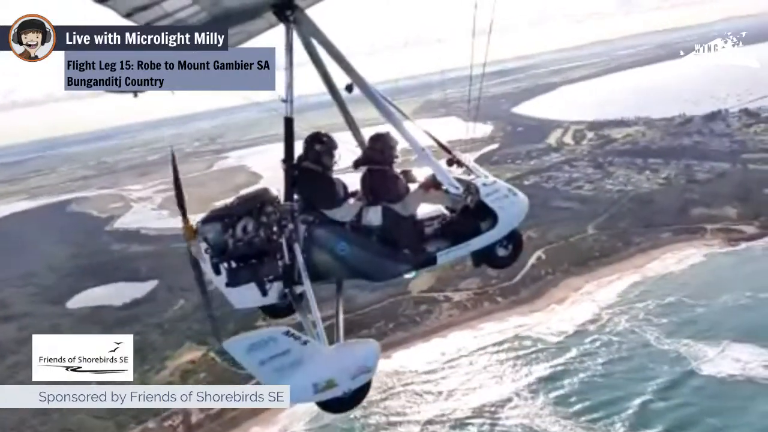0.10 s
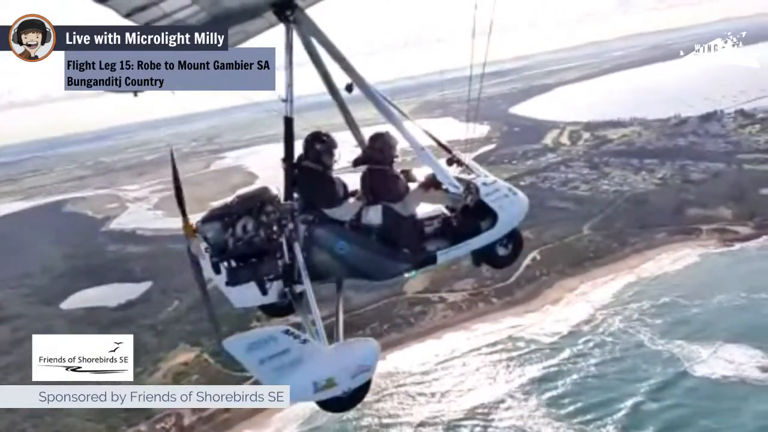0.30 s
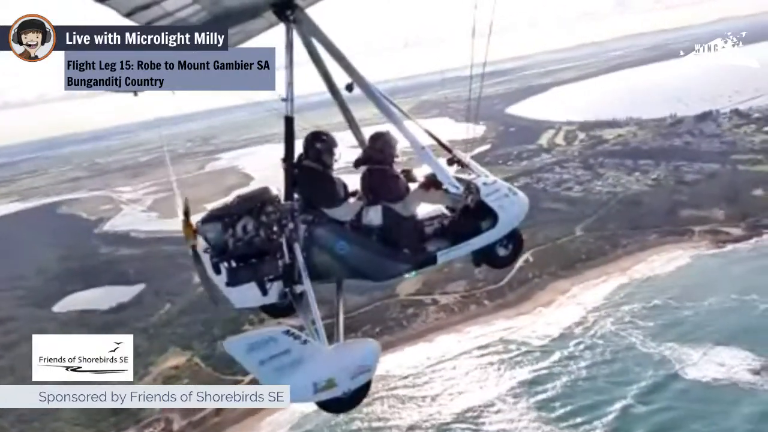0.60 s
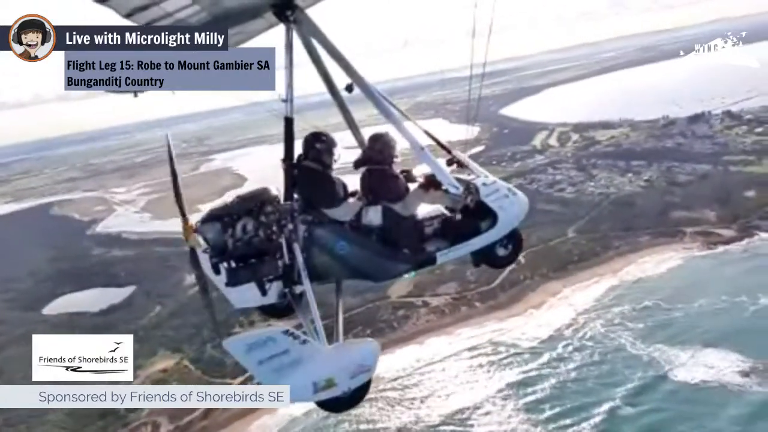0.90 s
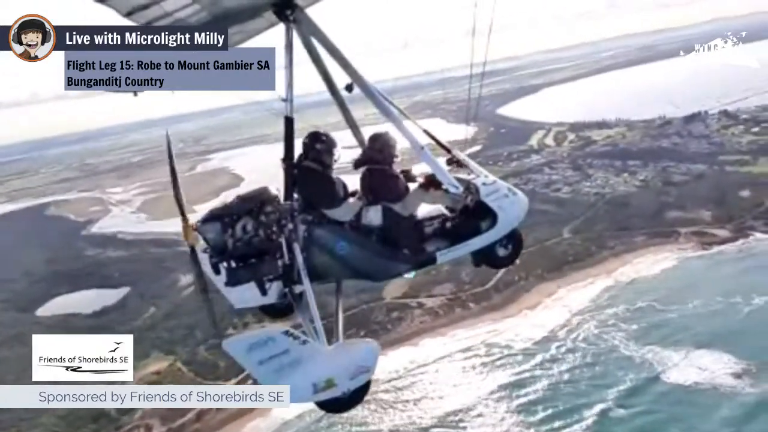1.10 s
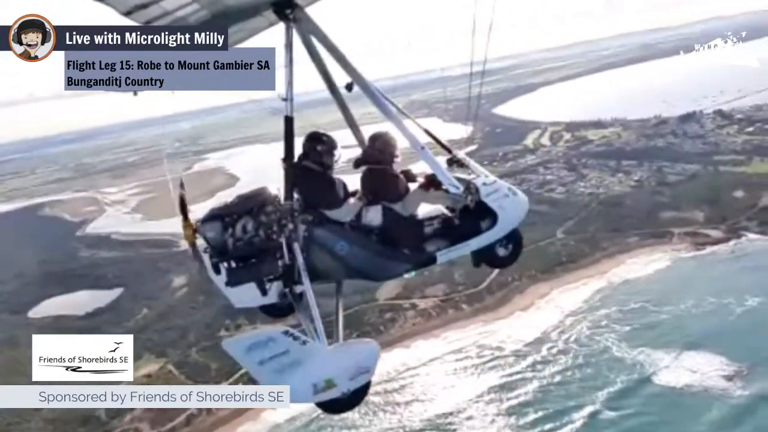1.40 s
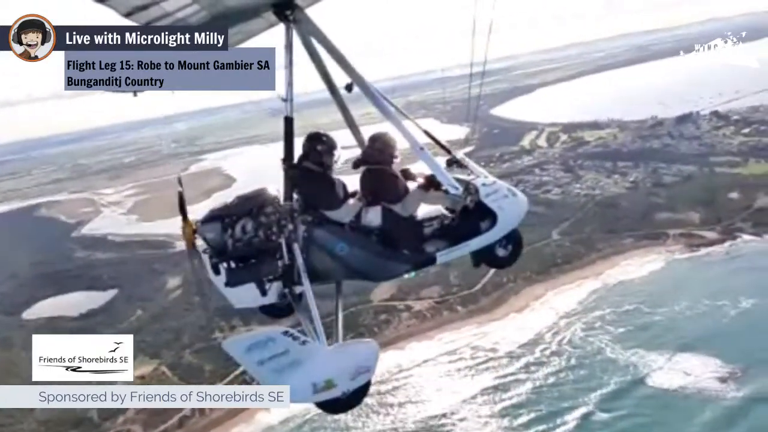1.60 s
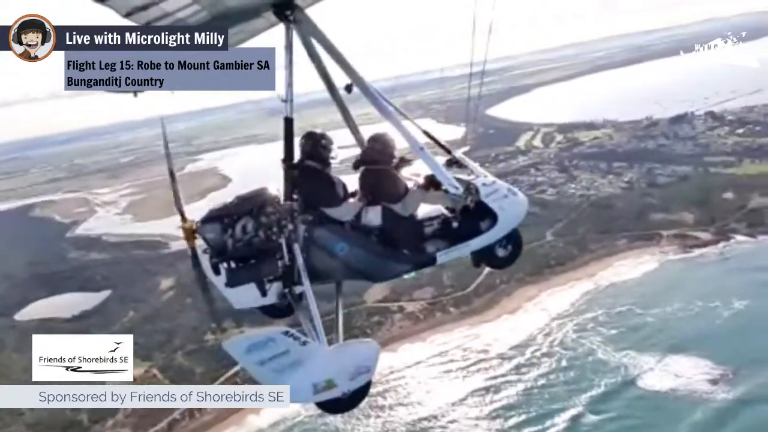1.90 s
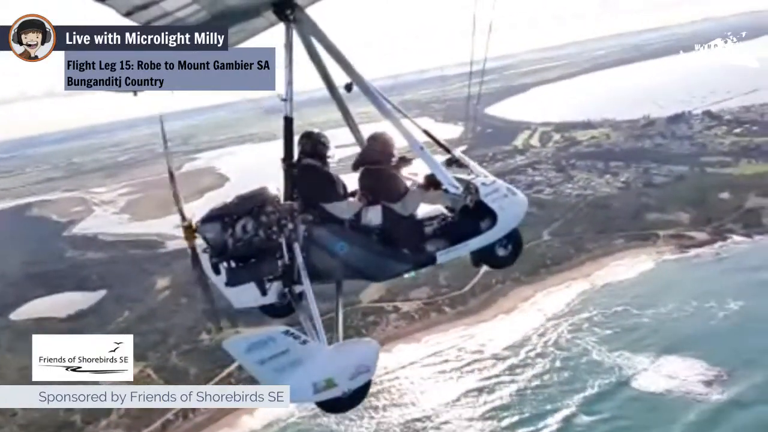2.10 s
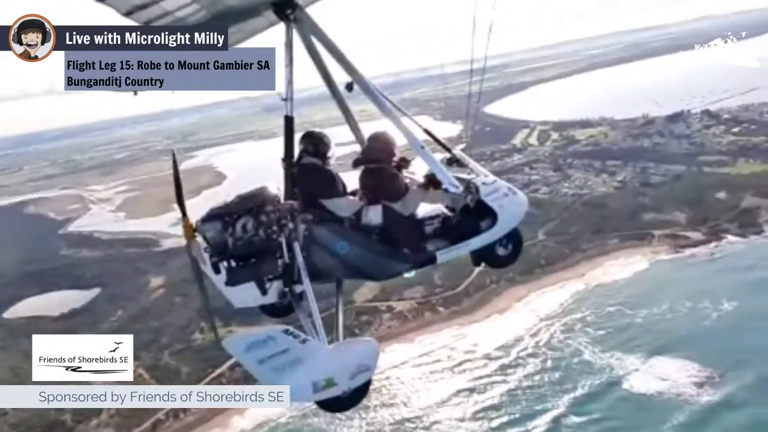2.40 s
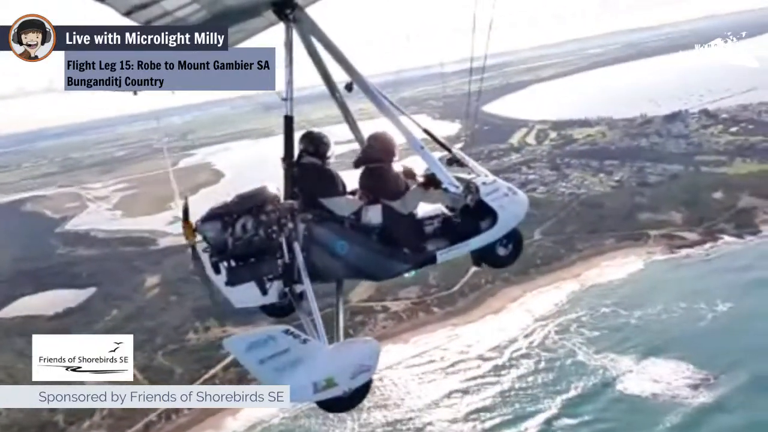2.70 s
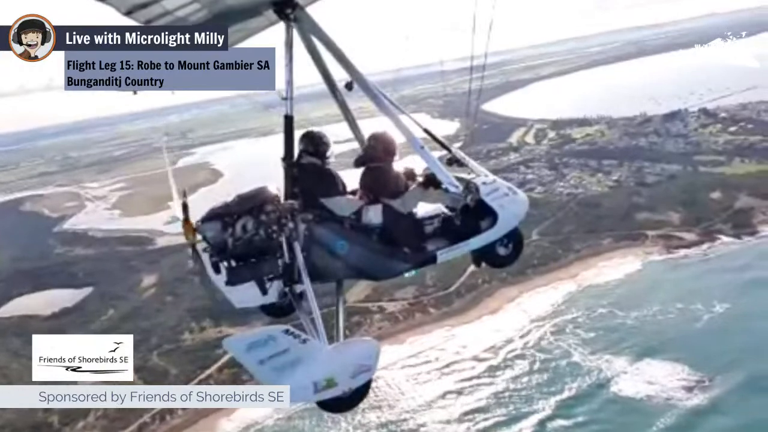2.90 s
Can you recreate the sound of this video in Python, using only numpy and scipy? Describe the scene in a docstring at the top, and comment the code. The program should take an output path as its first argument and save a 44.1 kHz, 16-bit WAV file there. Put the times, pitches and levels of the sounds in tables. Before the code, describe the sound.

Wind gusts thump and overload the microphone over the thin engine rasp of an open light aircraft

```python
"""An open light aircraft in flight, heard for three seconds through a narrow-band microphone.
It opens on a thin, flickering engine and slipstream rasp (noise through fixed resonances), a faint whine
(a wavering sine) and brief whistles (short swells of one pitch). From 0.2 s gusts (lumpy low noise) thump on
the capsule around 240 Hz, with hard buffets (short ringing bursts), and overload it. They ease after 1.5 s,
then return near 2.3 s and 2.7 s; the rasp carries on to the end."""
import sys
import numpy as np
from scipy import signal
from scipy.fft import rfft, irfft
from scipy.io import wavfile
from scipy.ndimage import uniform_filter1d

SR = 44100
rng = np.random.default_rng(int(sys.argv[2]) if len(sys.argv) > 2 else 0)


def inscribe(sig):
    """Save sig as 16-bit PCM at rate SR to the path in sys.argv[1].

    A 1-D sig is mono; a 2-D sig holds one channel per row.
    Samples are clipped to [-1, 1] before scaling.
    """
    pcm = np.round(np.clip(np.atleast_2d(sig).T, -1, 1) * 32767)
    wavfile.write(sys.argv[1], SR, pcm.astype(np.int16))


N = 132300  # samples, 3 s
FFT, HOP = 1024, 256  # short-time spectrum length and step, samples
FRAMES = N // HOP + 5


def amp(db):
    """Turn decibels into a plain multiplier."""
    return 10 ** (np.asarray(db) / 20)


def evened(x):
    """Scale a signal to an rms of 1."""
    return x / np.sqrt(np.mean(abs(x) ** 2) + 1e-20)


def read(points, hz):
    """Read a spectrum curve in dB, joining its points by straight lines over log frequency."""
    point_hz, value = np.transpose(points)
    return np.interp(np.log(hz + 1), np.log(point_hz + 1), value, right=-90)


def patches(shape, size):
    """Smooth random field of rms 1, blurred over size = (bins, frames)."""
    field = rng.standard_normal(shape[::-1]).T
    for axis in (0, 1, 0, 1):
        field = uniform_filter1d(field, size[axis], axis)
    return evened(field)


def shaped(db):
    """Noise of rms 1 from random short-time spectra that follow the level field db (bins x frames)."""
    real, imag = rng.standard_normal(db.shape[::-1] + (2,)).T
    spectra = (real + 1j * imag) * amp(db)
    return evened(signal.istft(spectra, nperseg=FFT, noverlap=FFT - HOP)[1][:N])


# How loud and how bright the engine rasp is over time. Each row: time in seconds, level in dB of its
# 1-6 kHz band before pulses and spits, treble setting in dB (TREBLE_USUAL_DB leaves the tone unchanged).
RASP_COURSE = [(0.0, -38.5, -1), (0.04, -38.5, -12), (0.06, -33.5, -19.5), (0.1, -39, -14.5),
               (0.22, -36, -11), (0.26, -32.5, -20.5), (0.37, -39.5, -14.5), (0.581, -38, -18),
               (1.038, -39.5, -14), (1.13, -31, -21.5), (1.189, -40, -10.5), (1.21, -33, -8.5),
               (1.252, -41.5, -13.5), (1.29, -33, -22), (1.372, -39, -16), (1.39, -31, -22.5),
               (1.46, -38, -14.5), (2.02, -40, -14), (2.321, -37, -17.5), (2.46, -37, -13),
               (2.78, -38, -17), (2.832, -41, -12), (3.0, -37.5, -18.5)]
# The basic tone of the rasp, before the resonances. Each row: frequency in Hz, relative level in dB per Hz.
RASP_TONE = [(35, -62), (60, -30.5), (89, -14), (268, -2.5), (507, -17), (582, -13), (656, -14),
             (1080, -22), (1430, -22.5), (3110, -23), (3430, -18), (3720, -25.5), (7040, -45.5),
             (9150, -66.5), (15500, -120)]
# Airframe resonances lifted out of the rasp. Each row: frequency in Hz, width in Hz, lift in dB.
AIRFRAME_RINGS = [(575, 50, 10), (836, 75, 9.5), (1093, 85, 12), (1234, 100, 11), (2400, 20, 12),
                  (2550, 55, 4), (3097, 32, 7), (3335, 68, 12.5), (4047, 110, 11.5), (4170, 38, 7.5),
                  (4800, 28, 7.5), (5210, 1000, 9), (7100, 82, 9)]
TREBLE_HZ, TREBLE_USUAL_DB = 3800, -12.5
# rms sizes of the random level changes: small patches, wide bands, the whole rasp
RASP_PATCH_DB, BAND_FLICKER_DB, FLICKER_DB = 2.5, 1.5, 0.5
FIRING_HZ, FIRING_DEPTH = 62.5, 0.04
SPITS_PER_S, SPIT_LIFT, SPIT_DECAY_S = 22, 1.22, 0.0013  # average rate, mean added gain, decay


def rasp():
    """Patchy noise through airframe resonances, pulsing weakly with the firing and spitting at random."""
    hz = np.fft.rfftfreq(FFT, 1 / SR)[:, None]
    shape = (len(hz), FRAMES)
    field = read(RASP_TONE, hz) + RASP_PATCH_DB * patches(shape, size=(4, 5))
    field = field + BAND_FLICKER_DB * patches(shape, size=(30, 2))
    field = field + FLICKER_DB * patches((1, FRAMES), size=(1, 2))

    s, level_db, treble_db = np.transpose(RASP_COURSE)
    treble_share = 1 / (1 + (TREBLE_HZ / (hz + 1)) ** 6)
    treble_now = np.interp(np.arange(FRAMES) * HOP / SR, s, treble_db)
    field = field + treble_share * (treble_now - TREBLE_USUAL_DB)

    fine_hz = np.fft.rfftfreq(N, 1 / SR)
    lift_db = sum(db / (1 + ((fine_hz - f) / (width / 2)) ** 2) for f, width, db in AIRFRAME_RINGS)
    noise = irfft(rfft(shaped(field)) * amp(lift_db), N)
    band_filter = signal.butter(4, [1000, 6000], "band", fs=SR, output="sos")
    band = signal.sosfilt(band_filter, noise)  # only used to set the level

    t = np.arange(N) / SR
    firing = 1 + FIRING_DEPTH * np.cos(2 * np.pi * FIRING_HZ * t)
    chance, size = rng.random((N, 2)).T
    spits = -np.log(1 - size) * (chance < SPITS_PER_S / SR)  # many small, few large
    decay = np.exp(-1 / (SPIT_DECAY_S * SR))
    gain = firing + SPIT_LIFT * signal.lfilter([1], [1, -decay], spits)
    return amp(np.interp(t, s, level_db)) * gain * noise / band.std()


WHINE_HZ, WHINE_DB = 3313, -50  # middle pitch and level
WHINE_WANDER_HZ, WHINE_WAVER_DB = 16, 4.5  # rms drift of each


def whine():
    """A thin engine whine: one sine whose pitch and level waver."""
    wander = np.repeat(patches((1, N // 64 + 1), size=(1, 9)), 64)[:N]
    waver = patches((1, N), size=(1, 900))[0]
    turns = np.cumsum(WHINE_HZ + WHINE_WANDER_HZ * wander) / SR
    return amp(WHINE_DB + WHINE_WAVER_DB * waver) * np.sin(2 * np.pi * turns)


# Short swells of one resonance. Each row: start in seconds, length in seconds, rough rms level in dB,
# pitch in Hz, spread of the pitch in Hz.
WHISTLE_SWELLS = [(0.001, 0.024, -32.5, 4730, 380), (0.214, 0.079, -22, 583.4, 35.6),
                  (0.275, 0.066, -30.5, 736, 59), (0.534, 0.03, -36.5, 3400, 61.6),
                  (0.769, 0.08, -11.5, 375, 49.2), (0.803, 0.042, -41.5, 2360, 98.5),
                  (0.846, 0.076, -27.5, 594, 35), (1.187, 0.053, -34, 3317, 116),
                  (1.196, 0.05, -50, 5360, 1620), (1.823, 0.048, -36, 592, 35),
                  (1.872, 0.019, -34.5, 2630, 1530), (2.054, 0.023, -35.5, 718, 477),
                  (2.342, 0.045, -27.5, 502, 71.6), (2.345, 0.041, -34.5, 755, 90),
                  (2.475, 0.016, -35, 1113, 80), (2.753, 0.046, -35.5, 3326, 60)]


def whistles():
    """Brief noisy whistles: eight nearby tones beat together as they swell and fade."""
    out = np.zeros(N)
    for start, length, db, hz, width in WHISTLE_SWELLS:
        t = np.arange(round(length * SR)) / SR
        tones = sum(np.exp(2j * np.pi * (width * (u - .5) * t + turn)) for u, turn in rng.random((8, 2)))
        wobble = evened(1 + tones)
        tone = (wobble * np.exp(2j * np.pi * hz * t)).real
        swell = 2 * np.sin(np.pi * t / length)
        part = out[round(start * SR):][:len(t)]
        part += (amp(db) * swell * tone)[:len(part)]
    return out


# Wind on the capsule. Each row: time in seconds, level in dB before DRIVE_DB is added, centre of the thump
# in Hz, narrowness (a plain number, held between 0.5 and 2, that stretches the dB curve below).
GUST_COURSE = [(0.0, -36.5, 262, 1.5), (0.16, -63, 265.5, 1.6), (0.19, -48, 188.7, 3.3),
               (0.23, -2, 174, 1.2), (0.27, -8, 225, 0.76), (0.47, -3, 207, 0.91), (0.52, -6, 228.7, 0.7),
               (0.57, -2, 197, 1.08), (0.65, -2, 264, 0.9), (0.81, -6.5, 236, 0.72), (0.87, -7, 221, 1.1),
               (1.02, -4, 220, 1.5), (1.12, -9.5, 249, 3.4), (1.167, -23, 220, 3.2), (1.2, -9, 241, 0.72),
               (1.25, -6, 216.5, 2.2), (1.29, -8.5, 252.4, 1.2), (1.424, -5, 256, 1.7),
               (1.456, -30.5, 235.6, 0.85), (1.53, -16.5, 251.5, 3), (1.59, -20, 225, 1.5),
               (1.6, -35, 214.6, 0.84), (1.74, -20.5, 284.4, 1.1), (1.8, -34.5, 184.5, 0.44),
               (1.85, -21.5, 252.6, 0.75), (1.97, -41, 332, 1.7), (2.07, -29.5, 228.6, 0.51),
               (2.13, -37.5, 314.5, 0.45), (2.22, -51.5, 234, 0.49), (2.26, -12, 222.5, 0.65),
               (2.315, -9.5, 251.5, 0.61), (2.38, -15, 255, 3.3), (2.4, -6.5, 274.7, 2.6),
               (2.46, -48, 319, 2.6), (2.67, -28, 247, 0.38), (2.69, -5.5, 232.4, 1.2),
               (2.715, -8.5, 252, 3.3), (2.74, -29.5, 253, 0.3), (2.88, -40, 231, 0.64),
               (2.94, -22.5, 237, 1.5), (3.0, -64, 236, 1.4)]
# The tone of a thump centred on THUMP_HZ. Each row: frequency in Hz, relative level in dB per Hz.
THUMP_TONE = [(12, -69.5), (20, -44), (59, -40), (124, -14), (211, -0.5), (253, 4), (330, -12), (379, -10),
              (461, -23), (515, -44), (560, -23), (730, -56.5), (1230, -120)]
THUMP_HZ, THUMP_PATCH_DB, DRIVE_DB = 240.6, 0.5, -2
STEADY, LUMP_S = 0.61, 0.025  # how strongly chance lumps are evened out (0 to 1), over this time


def wind():
    """Lumpy low noise from gusts on the capsule, with a wandering centre and width."""
    s, db, centre, narrow = np.transpose(GUST_COURSE)
    hz = np.fft.rfftfreq(FFT, 1 / SR)[:, None]
    frame_t = np.arange(FRAMES) * HOP / SR
    moved_hz = hz * THUMP_HZ / np.interp(frame_t, s, centre)
    field = read(THUMP_TONE, moved_hz) * np.clip(np.interp(frame_t, s, narrow), .5, 2)
    noise = shaped(field + THUMP_PATCH_DB * patches(field.shape, size=(2, 3)))

    half_lump = round(LUMP_S * SR / 2)
    power = uniform_filter1d(uniform_filter1d(noise ** 2, half_lump), half_lump)
    lumps = np.sqrt(power + 1e-4)
    level_db = np.interp(np.arange(N) / SR, s, db) + DRIVE_DB
    return amp(level_db) * evened(noise / lumps ** STEADY)


# The hardest buffets within the gusts. Each row: middle in seconds, height of the swell in dB,
# ringing pitch in Hz, half width in seconds (standard deviation of the bell-shaped swell).
BUFFET_HITS = [(.243, 0, 192, 0.0035), (0.256, 2, 255, 0.0027), (.318, 4.5, 218, 0.0023),
               (0.355, 3.5, 262, 0.0017), (.391, 4, 219, 0.0042), (.414, 0, 217, 0.0044),
               (0.464, 3.5, 186, 0.0033), (0.486, 1.5, 231, 0.01), (0.567, -3.5, 246, 0.0046),
               (.582, 2.5, 253, 0.0019), (.612, 3, 245.6, 0.006), (0.631, 3, 299, 0.0025),
               (.655, -3.5, 272, 0.0033), (.676, 1.5, 223, 0.0082), (0.698, 2.5, 256, 0.0058),
               (0.733, 0, 238, 0.0036), (0.76, 1.5, 193.5, 0.0045), (.781, 0, 268.6, 0.008),
               (.802, 0.5, 263, 0.0041), (.829, 0, 262, 0.0025), (.889, .5, 208, 0.0049),
               (.955, 3, 232, 0.0062), (.991, 2, 206.3, 0.0072), (1.213, 1.5, 243, 0.0031),
               (1.407, 1.5, 293, 0.0081), (2.297, -2.5, 251, 0.016), (2.695, 1.5, 234.4, 0.0067)]
BUFFET_SHARE = .75  # how far a buffet pushes the churning aside, 0 to 1


def buffets(churn):
    """Each hard buffet rings the capsule briefly and drowns the churning."""
    t, ring, hold = np.arange(N) / SR, np.zeros(N), np.zeros(N)
    for (at, db, hz, half), turn in zip(BUFFET_HITS, rng.random(len(BUFFET_HITS))):
        bell = np.exp(-.5 * ((t - at) / half) ** 2)
        ring += amp(db) * bell * np.cos(2 * np.pi * (hz * (t - at) + turn))
        hold = np.maximum(hold, bell)
    return ring + churn * (1 - BUFFET_SHARE * np.sqrt(hold))


def scene():
    """Add the rasp, whine, whistles and buffeting wind into one channel."""
    return (rasp() + whine() + whistles() + buffets(wind()))[None]


LOW_CUT_HZ, HIGH_CUT_HZ, EDGE_HZ = 69, 7440, 15800  # EDGE_HZ is the final band limit
CEILING, SAG_HZ = .953, 8  # clipping level; cutoff of the filter that lets flat tops sag
# share of the excess dB that is turned down, reaction time, fall of the held peak
LIMIT_SHARE, ATTACK_S, RECOVER_DB_PER_S = 0.69, 0.0013, 347


def record(dry):
    """Narrow the band; limit a moment late so first peaks clip and their flat tops sag; band-limit again."""
    low_cut = signal.butter(3, LOW_CUT_HZ, "high", fs=SR, output="sos")
    x = signal.sosfilt(low_cut, dry)
    high_cut = signal.firwin(255, HIGH_CUT_HZ, window=("kaiser", 6), fs=SR)
    x = signal.oaconvolve(x, high_cut[None], "same")

    # hold each peak and let it fall steadily, then follow it with a short lag
    fall = np.arange(N) * RECOVER_DB_PER_S / SR
    peak_db = 20 * np.log10(abs(x[0]) / CEILING + 1e-9)
    over_db = np.maximum(np.maximum.accumulate(peak_db + fall) - fall, 0)
    lag = np.exp(-1 / (ATTACK_S * SR))
    x = x / amp(LIMIT_SHARE * signal.lfilter([1 - lag], [1, -lag], over_db))

    clipped = np.clip(x, -CEILING, CEILING)
    sag = signal.butter(1, SAG_HZ, "high", fs=SR, output="sos")
    x = signal.sosfilt(sag, clipped)
    edge = signal.firwin(511, EDGE_HZ, window=("kaiser", 9), fs=SR)
    return signal.oaconvolve(x, edge[None], "same")


dry = scene()
out = record(dry)
inscribe(out)
```